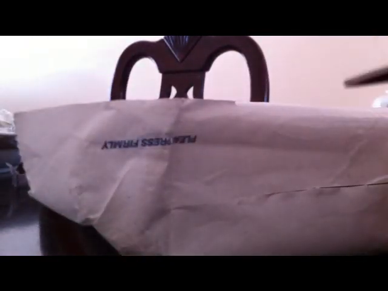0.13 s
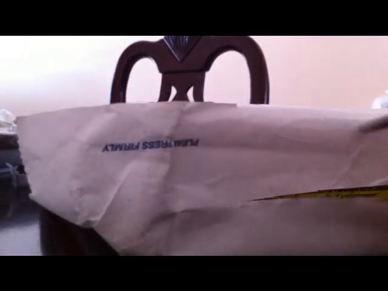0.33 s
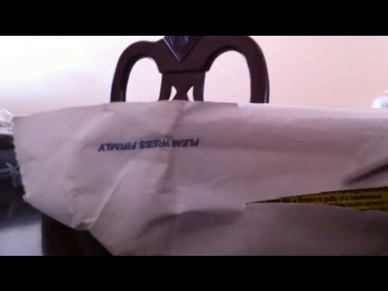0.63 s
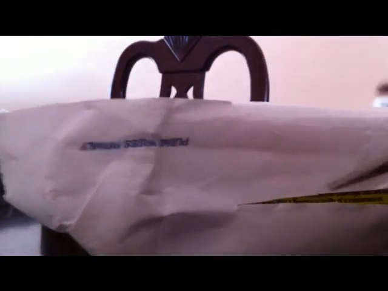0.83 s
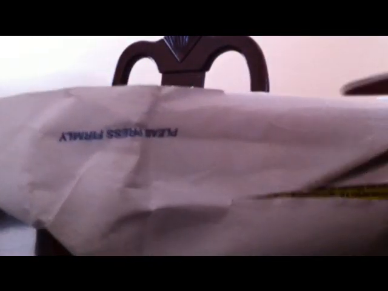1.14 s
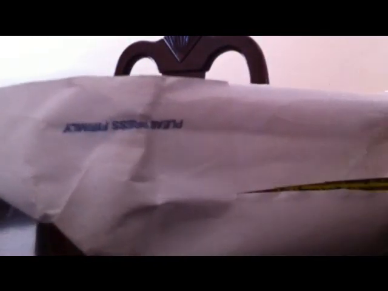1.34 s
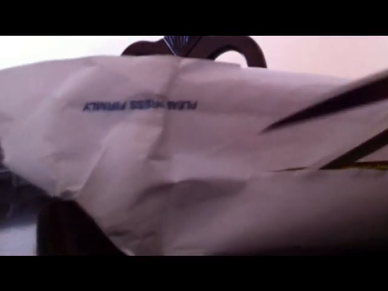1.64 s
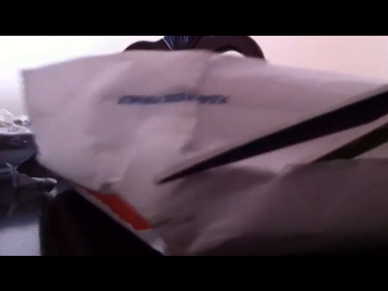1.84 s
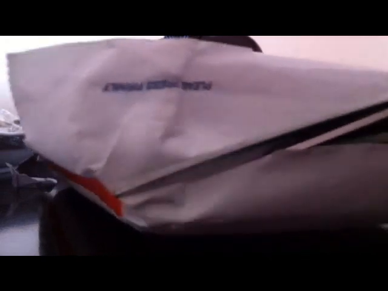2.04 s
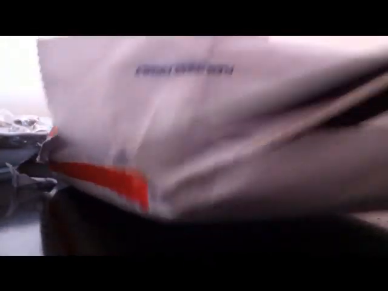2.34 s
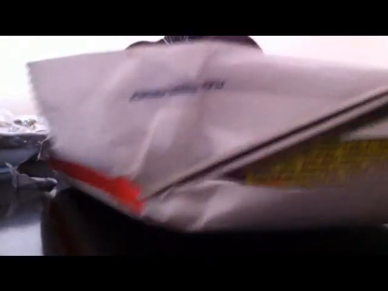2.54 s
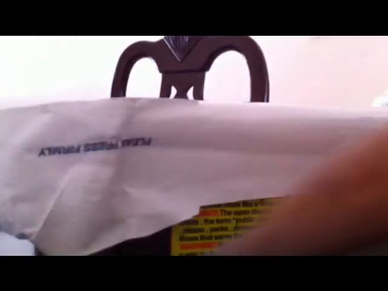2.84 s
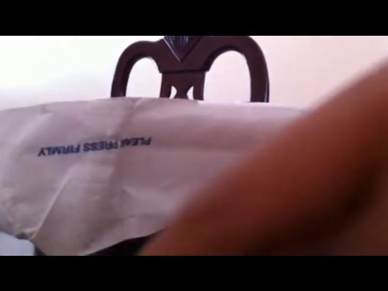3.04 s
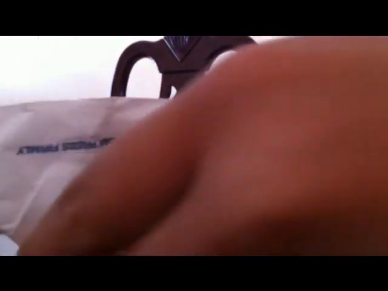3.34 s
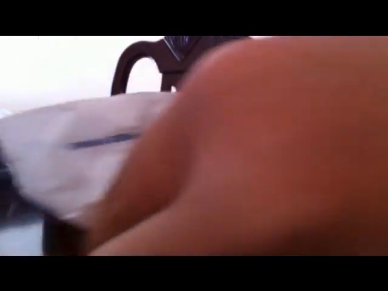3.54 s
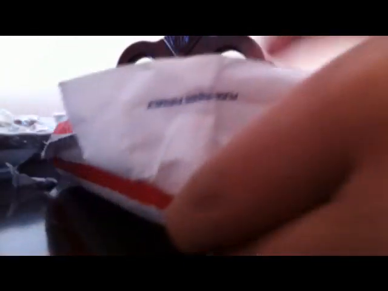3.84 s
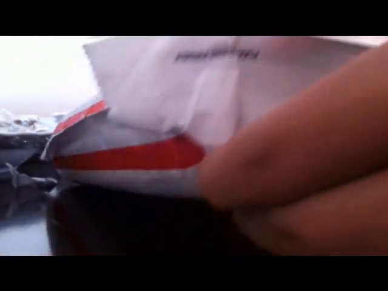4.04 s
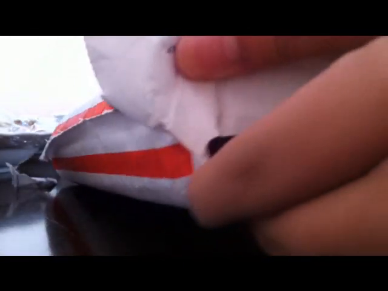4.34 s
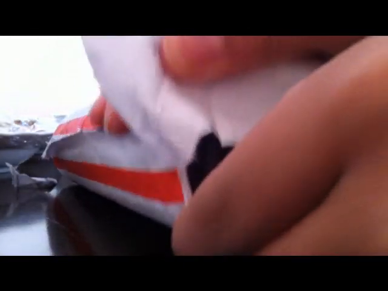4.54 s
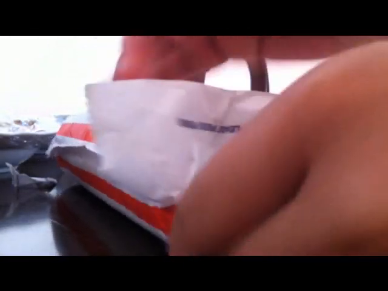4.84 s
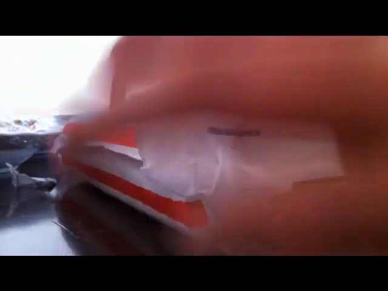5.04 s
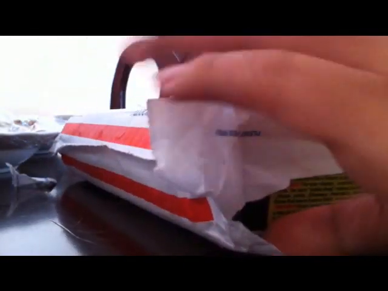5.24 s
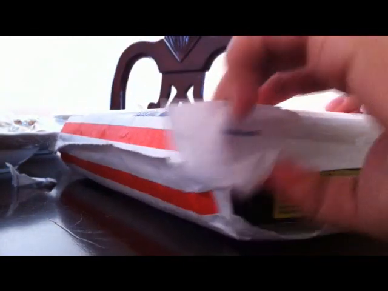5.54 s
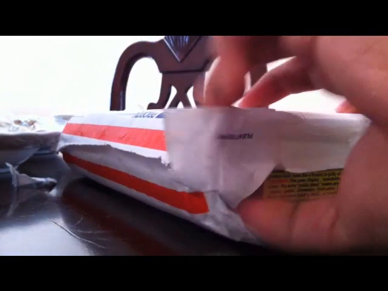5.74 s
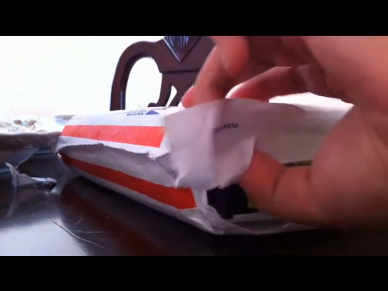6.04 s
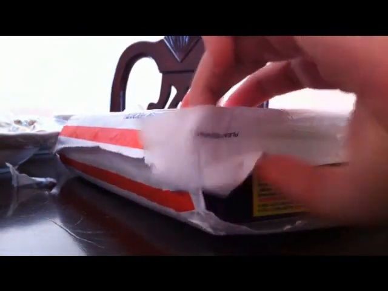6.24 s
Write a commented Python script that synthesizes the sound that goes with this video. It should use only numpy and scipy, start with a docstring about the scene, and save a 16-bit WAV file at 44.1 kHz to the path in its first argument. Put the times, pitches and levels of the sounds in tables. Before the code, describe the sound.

Quiet hiss with a faint low table hum that swells and fades throughout. From 0 to 0.6 s, weak paper rustles and small dull creases. At 0.84 s a sharp dry snap, then mostly quiet with little ticks near 0.93 and 1.28 s. From 1.7 to 2.3 s the stiff mailer is slit and torn: rough swishes, crackles, strongest around 2.0-2.15 s. Another rip and crumple at 2.5-2.9 s with a soft table thud. Light rubbing until 3.54 s, when the scissors land: a loud, hard metallic-wooden double knock, low thump and short rattle. At 3.75 s a very loud paper crack. A lull with tiny ticks, then dense bright crackling at 4.3-4.9 s, a crisp snap at 5.05 s, and scattered short crinkles and slides from 5.4 s, softening to 6.4 s. Close microphone, small hard room with brief echo.

```python
"""First a quiet hiss and a faint rustle; the table top's low hum swells and fades, made as narrow filtered noise.
Close to a small camera, a stiff paper mailer on a table is slit with scissors, torn and crumpled by hand.
Its fibres rip and rustle in clumps of tiny cracks; creases are spiky noise bursts through panel and parcel modes.
The scissors are laid on the table, a knock and rattle of resonances; weight lands as short, low decaying sines.
A small hard room answers, as decaying noise."""
import sys
import numpy as np
from scipy import signal
from scipy.fft import rfft, irfft, next_fast_len
from scipy.io import wavfile
from scipy.ndimage import uniform_filter1d, map_coordinates

SR = 44100
rng = np.random.default_rng(int(sys.argv[2]) if len(sys.argv) > 2 else 0)


def dump(signal):
    """Clip the signal to [-1, 1] and save it as 16-bit WAV at the path in sys.argv[1]."""
    limited = np.clip(np.atleast_2d(signal).T, -1, 1)
    pcm = np.round(limited * 32767).astype(np.int16)
    wavfile.write(sys.argv[1], SR, pcm)


N = 281358


def amp(db):
    """Decibels to gain."""
    return 10 ** (np.asarray(db) / 20)


def unit(x):
    """Scaled to rms 1."""
    return x / np.sqrt(np.mean(x ** 2) + 1e-20)


def along(points, hz):
    """Interpolate (frequency, value) points on a log frequency axis."""
    f, v = np.transpose(points)
    return np.interp(np.log(hz + 1), np.log(f + 1), v)


def curves(rows):
    """One value per sample for each column after the time."""
    s, *cols = np.transpose(rows)
    return [np.interp(np.arange(N) / SR, s, c) for c in cols]


def wobble(rate):
    """A smooth random curve, rate knots a second."""
    knots = rng.standard_normal(int(N * rate / SR) + 4)
    return map_coordinates(knots, [np.arange(N) * rate / SR])


def filtered(x, response):
    """x times a complex response of frequency, zero-padded."""
    n = x.shape[-1]
    m = next_fast_len(2 * n)
    return irfft(rfft(x, m) * response(np.fft.rfftfreq(m, 1 / SR)), m)[..., :n]


def mode(hz, width_hz):
    """A causal resonance of peak gain 1."""
    return lambda f: 1j * f * width_hz / (hz * hz - f * f + 1j * f * width_hz + 1e-9)


# Colour of the room and preamp hiss: (frequency [Hz], relative density [dB per Hz])
HISS_COLOUR = [(41, -49), (70, -35), (169, 13), (373, 9.5), (717, -2), (860, 0), (1550, 4), (13500, -14),
               (15500, -29)]
HISS_DB = -64  # centre of a slowly wandering level
# Spells of the table top's low ringing hum: (start [s], length [s], level [dB])
HUM_SPELLS = [(0.063, 0.53, -68), (0.838, .6, -69), (1.89, 0.34, -62.5), (2.61, 0.61, -68.5),
              (3.497, .35, -66), (4.617, 0.49, -74.5), (5.376, 0.41, -67)]
HUM_HZ, HUM_WIDTH_HZ = 179.8, 17
HUM_BETWEEN_DB, HUM_FADE_S = -77, 0.065  # the floor lies under the spells too


def background():
    """Coloured hiss wanders slightly in level; the table top's low hum, narrow filtered noise, swells and fades."""
    hiss = unit(filtered(rng.standard_normal(N), lambda f: amp(along(HISS_COLOUR, f))))
    hum = unit(filtered(rng.standard_normal(N), mode(HUM_HZ, HUM_WIDTH_HZ)))
    t = np.arange(N) / SR
    hum_gain = amp(HUM_BETWEEN_DB)
    for start, length, db in HUM_SPELLS:
        nearest_edge = np.minimum(t - start, start + length - t)
        hum_gain = hum_gain + amp(db) * np.clip(nearest_edge / HUM_FADE_S + .5, 0, 1)
    return amp(HISS_DB + wobble(4.72)) * hiss + hum_gain * hum


# Decay of the small hard room, before its furnishings: (frequency [Hz], t60 [s])
WALL_DECAY = [(150, 0.35), (600, 0.36), (2500, 0.41), (8000, 0.54), (14000, 1)]


def room(x):
    """The walls answer after a short gap; each frequency dies at its own speed."""
    hz, t, z = signal.stft(rng.standard_normal(SR // 2), SR, nperseg=256)
    fading = z * amp(-60 * t / along(WALL_DECAY, hz)[:, None])
    tail = signal.istft(fading, SR, nperseg=256)[1]
    tail = tail * np.clip(np.arange(len(tail)) / SR / 0.0017, 0, 1)
    # soft furnishings swallow the treble
    tail = filtered(tail, lambda f: 1 / (1 + 1j * f / 3300) ** 2)
    gap = np.zeros(round(.01 * SR))
    return signal.fftconvolve(x, np.r_[gap, tail / np.linalg.norm(tail)])[:N]


# Weight landing on the table top: (time [s], level before the attack and decay [dB])
TABLE_THUDS = [(2.527, -52), (2.836, -29), (3.54, -27), (4.721, -65), (4.864, -40), (5.415, -50)]
THUD_HZ, THUD_T60_S, THUD_ATTACK_S = 179, 0.082, 0.00081  # pitch varies a little around this


def thuds():
    """A soft push sets the table top's lowest mode going, a sine that dies quickly."""
    out, t = np.zeros(N + SR), np.arange(SR // 4) / SR
    for s, db in TABLE_THUDS:
        hz = THUD_HZ * np.exp(0.067 * rng.standard_normal())
        envelope = amp(db - 60 * t / THUD_T60_S) * (1 - np.exp(-t / THUD_ATTACK_S))
        out[round(s * SR):][:len(t)] += envelope * np.sin(2 * np.pi * hz * t)
    return out[:N]


def fibres(n, crackle):
    """Dense tiny cracks over a hiss of sliding fibres, n samples of rms 1."""
    sizes = amp(np.minimum(4 * rng.exponential(size=n), 11)) * rng.standard_normal(n)
    cracks = unit((rng.random(n) < .012) * sizes)
    return unit(crackle * cracks + rng.standard_normal(n))


def crinkles(depth):
    """Gain of a rubbing sound: small folds pop at random, sudden and dying in a few ms."""
    pops = (rng.random(N) < 45 / SR) * rng.exponential(size=N)
    decay = np.exp(-1 / (.004 * SR))
    return 1 + depth * signal.lfilter([1], [1, -decay], np.minimum(pops, 2.5))


# Colour of the rubbed paper: (frequency [Hz], relative density [dB per Hz])
SHEET_COLOUR = [(59, -38), (110, -10), (274, 1), (452, 3.5), (885, 6.5), (1730, 4), (2420, -1), (4260, 0),
                (13000, -8), (15000, -12.5)]
# The sheet in the hands, between strokes: (time [s], level [dB], body [dB re level])
RUSTLE_LEVELS = [(0.0, -58.5, -8.5), (0.32, -99, 29), (0.65, -65, 0), (0.95, -62, 4), (1.265, -73, 2),
                 (1.285, -51, 7), (1.43, -75.5, 11.5), (1.6, -84, 16.5), (1.8, -56.5, 0.5),
                 (2.04, -46.5, -12.5), (2.26, -58.5, -1.5), (2.57, -63, 3.5), (2.75, -43.5, -10),
                 (3.05, -60.5, -6), (3.3, -56.5, -10), (3.72, -57.5, -20), (3.78, -46.5, 1),
                 (3.92, -62.5, -6.5), (4.15, -65, -8), (4.3, -60.5, -5), (4.6, -54, -12), (4.98, -48, -5),
                 (5.18, -61, -13), (5.32, -59.5, -9), (5.45, -51.5, -16.5), (5.7, -55, -7), (6.38, -56, -7)]
RUSTLE_SIZZLE_DB, SIZZLE_GROWS = -11.5, 0.8  # re level, at -37 dB; dB gained per dB: harder handling is brighter


def rustle():
    """Cracks bunched in clumps, coloured by the sheet; the grip shifts weight to the body."""
    level_db, body_db = curves(RUSTLE_LEVELS)
    sizzle_db = RUSTLE_SIZZLE_DB + SIZZLE_GROWS * (level_db + 37)
    grain = fibres(N, crackle=0.69)
    shared = crinkles(depth=0.75)

    def band(low_hz, high_hz):
        """The sheet's colour between two edges, with clumps partly its own."""
        edges = lambda f: np.sqrt((1 + (low_hz / (f + 1)) ** 6) * (1 + (f / high_hz) ** 6))
        clumps = amp(2.2 * wobble(25)) * shared * crinkles(depth=.9)
        return unit(clumps * filtered(grain, lambda f: amp(along(SHEET_COLOUR, f)) / edges(f)))

    middle = band(1610, 9450)
    body = band(170, 780)
    sizzle = band(13500, 30000)
    return amp(level_db) * (middle + amp(body_db) * body + amp(sizzle_db) * sizzle)


# Single rips or slides of the sheet:
# (time [s], rise [s], hold [s], level before swell and crinkles [dB], ring [Hz])
SHEET_STROKES = [(0.269, .018, 0.016, -60.5, 2000), (0.527, 0.048, 0.041, -54, 2320),
                 (1.731, 0.089, 0.036, -46, 1780), (1.863, 0.034, 0.053, -45.5, 2550),
                 (2.036, 0.042, 0.047, -42.5, 2120), (2.135, 0.0047, 0.0041, -29.5, 2220),
                 (2.147, 0.0031, 0.032, -37, 2360), (2.363, 0.0046, 0.031, -57, 940),
                 (2.483, 0.0012, 0.015, -42, 1950), (2.515, 0.0046, 0.052, -42, 2400),
                 (2.643, 0.0061, 0.22, -51.5, 1650), (2.774, 0.0014, 0.016, -34.5, 2200),
                 (2.79, 0.025, 0.03, -39, 3530), (2.912, 0.0035, 0.068, -45.5, 5270),
                 (3.075, .016, 0.1, -57.5, 4970), (3.237, .003, 0.046, -51, 5170),
                 (3.322, 0.0049, 0.074, -47.5, 2900), (4.268, 0.026, 0.081, -51.5, 5070),
                 (4.862, .0044, 0.016, -35, 4900), (4.901, 0.028, 0.14, -65, 1030),
                 (5.056, 0.0039, 0.081, -52.5, 2540), (5.506, 0.0035, 0.048, -48.5, 3780),
                 (5.57, 0.0038, 0.13, -53.5, 2800), (5.652, 0.0017, 0.021, -47.5, 6030),
                 (5.782, 0.063, 0.027, -46, 2070), (5.919, 0.027, 0.02, -51.5, 1690),
                 (6.168, 0.0052, 0.031, -54, 4370)]
FALL_S, FALL_PER_HOLD = 0.031, 0.67  # longer strokes fade slower
STROKE_TILT_DB = 1.5  # per octave around 3 kHz


def strokes():
    """Each stroke swells, holds and fades, and sings faintly where the taut panel resonates."""
    out, t = np.zeros(N + SR), np.arange(SR // 4) / SR
    tilt = lambda f: amp(STROKE_TILT_DB * np.clip(np.log2((f + 1) / 3000), -1.5, 1.5))
    for s, rise, hold, db, hz in SHEET_STROKES:
        fall = FALL_S + FALL_PER_HOLD * hold
        corners_s = np.cumsum(np.abs([0, rise, hold, fall, .01]))
        effort_db = np.interp(t, corners_s, [-20, 1, -1, -48, -90])
        ring = lambda f: 1 + amp(5) * np.abs(mode(hz, .2 * hz)(f)) ** 2
        colour = lambda f: amp(along(SHEET_COLOUR, f)) * tilt(f) * ring(f)
        rip = unit(filtered(fibres(len(t), crackle=0.11), colour))
        out[round(s * SR):][:len(t)] += amp(db + effort_db) * rip
    return out[:N] * crinkles(depth=1.0)


# The scissors touch the table: (time [s], knock peak [dB])
SCISSOR_TOUCHES = [(3.538, -9.5), (3.5519, -17.5)]
# Modes of the scissors with the table under them: (frequency [Hz], level [dB], rattle t60 [s])
SCISSOR_MODES = [(213, -10, .1), (496, 0, 0.18), (845, -19, 0.19), (1110, -5, 0.18), (1790, -0.5, 0.26),
                 (2615, -2.5, 0.1), (3780, -10.5, 0.12)]
CRACK_DB = -25  # the broad edge of the knock
CONTACT_S = 0.00253
RATTLE_DB, RATTLE_WIDTH_HZ = -20.5, 74  # re knock; loose blades
SCISSORS_ECHO_DB = -18  # share sent to the room


def scissors():
    """Each touch is a short knock coloured by the modes; the loose blades rattle on faintly in the same modes."""
    out, t = np.zeros(N + SR), np.arange(SR // 2) / SR

    def body(f):
        """The modes with alternating sign, and the broad crack."""
        modes = sum((-1) ** k * amp(level) * mode(hz, 300)(f) ** 2
                    for k, (hz, level, _) in enumerate(SCISSOR_MODES))
        return modes + amp(CRACK_DB) * mode(4000, 7000)(f)

    for s, db in SCISSOR_TOUCHES:
        push = rng.standard_normal(len(t)) * t * np.exp(-t / (CONTACT_S / 4))
        knock = filtered(push, body)
        knock = knock / np.abs(knock).max()
        rattle = np.zeros(len(t))
        for hz, level, t60 in SCISSOR_MODES:
            ringing = unit(filtered(rng.standard_normal(len(t)), mode(hz, RATTLE_WIDTH_HZ)))
            rattle += amp(level - 60 * t / t60) * ringing
        rattle *= 1 - np.exp(-t / 0.001)
        out[round(s * SR):][:len(t)] += amp(db) * (knock + amp(RATTLE_DB) * rattle)
    return out[:N]


# Creases snapping close by: (time [s], ring energy [dB re 1 ms at full scale], ring [Hz],
# thump [dB re ring], sizzle [dB re ring], nominal length [ms])
CREASE_SNAPS = [(0.1993, -44.5, 1170, 3, -10.5, 5.6), (0.4018, -39.5, 2250, -10, -7.5, 4.6),
                (0.4268, -35, 690, 6.5, -25, 2), (0.5041, -37, 1110, 5.5, -3, 3.4),
                (0.8373, -16, 3020, -19, -5, 0.97), (0.8387, -23, 1110, -7, -23, 0.87),
                (0.9258, -37, 1970, -7.5, -27, 0.51), (1.2753, -30, 2450, -1, -12.5, 2.3),
                (1.604, -48.5, 890, 5.5, -24, 6.4), (1.6434, -46, 900, 7, -9, 6),
                (1.871, -37, 2150, -5, -5, 4.6), (1.881, -30, 1790, -5, -4.5, 3.2),
                (1.9941, -19.5, 1450, -7.5, -10, 2.2), (2.055, -36, 1000, 2.5, -16, 7.9),
                (2.082, -24, 1480, -12, -16, 17), (2.1341, -18.5, 1890, -3.5, -27, 3.7),
                (2.145, -21, 2200, -25, -22, 1.2), (2.2801, -24.5, 1770, -5, -9, 1.4),
                (2.2889, -27.5, 2500, -8, -11, 0.76), (2.3184, -35.5, 870, 9, -30, 6.7),
                (2.5538, -30, 3080, -5, -24, 2.1), (2.562, -40, 2250, 2, 3, 2.1),
                (2.6213, -41, 1180, -1.5, -19, 2.9), (2.651, -36, 1530, -14, -24, 4.8),
                (2.7748, -20, 2270, -17, -23, 7.9), (2.8142, -22.5, 1150, 1, -7.5, 3.4),
                (2.8349, -24.5, 2090, -1.5, -3.5, 3.2), (2.8425, -27, 2750, 1.5, -16, 4.5),
                (3.013, -46.5, 800, 2, 0, 12), (3.117, -50, 1220, 11, -8, 4.8),
                (3.492, -41.5, 3040, -9, -18, 4.5), (3.743, -7.5, 950, -19.5, -22, 1.1),
                (3.747, -13, 2260, -16, -37, 1.3), (3.7507, -17.5, 1780, -7, -18, 1.9),
                (4.101, -47, 2590, -21, -11, 1.5), (4.1333, -41, 2350, -30, -10, 2.4),
                (4.1481, -43.5, 2880, -5, -26, 1.9), (4.1934, -45, 2880, 4, -27, 1.3),
                (4.3056, -39, 2400, -16, -18, 8.7), (4.357, -38, 2240, -1.5, -2, 8.5),
                (4.408, -37.5, 4350, -29, -24, 4.7), (4.424, -33, 4500, -28, -12, 0.39),
                (4.466, -29, 1950, -17, -29, 2.7), (4.482, -28.5, 5230, -35, -24, 28),
                (4.4961, -23.5, 4470, -42, -20, 5.1), (4.5114, -29, 3200, -6.5, -3.5, 2.4),
                (4.5236, -30, 3780, -33, -17, 0.62), (4.548, -28, 4400, -37, -24, 6.4),
                (4.5597, -26.5, 4400, -29, -23, 6.2), (4.595, -43, 3290, 4, -10, 7.6),
                (4.62, -42, 3170, -12, -20, 3.8), (4.7067, -35, 4010, -13, -17, 10),
                (4.7162, -32.5, 3570, -9.5, -4, 6.6), (4.7268, -33, 2930, -19, -2, 7.9),
                (4.7403, -28.5, 1900, -22, -2, 3.6), (4.778, -39.5, 2720, -24, 1, 12),
                (4.8608, -24, 2300, -6, -8.5, 1.3), (4.8736, -34.5, 3520, 3, -16, 5.8),
                (4.9913, -40, 2880, -13, -13, 0.9), (5.0053, -36, 3400, 0.5, -2, 1.1),
                (5.049, -17, 5640, -19.5, -15, 1.2), (5.052, -27, 4120, -7, -34, 1.6),
                (5.4198, -33, 4440, -15.5, -1.5, 6.2), (5.506, -29.5, 3970, -23, -4, 15),
                (5.656, -28, 5230, -33, -5, 2), (5.703, -43, 2280, -10, -2.5, 1.4),
                (5.8539, -31, 1690, -2, -6, 2.7), (5.971, -36, 1670, -17, -1, 2.7),
                (6.02, -43, 5760, -15, -27, 1.1), (6.082, -40.5, 3970, -13, -22, 0.26),
                (6.14, -42, 3140, -8, -10, 3.7), (6.2907, -57, 3280, -11, -14, .9)]
SPREAD_OCT, SPREAD_FALLS = 0.87, 0.088  # width setting of a 2 kHz ring; amount lost per octave of pitch
THUMP_HZ, THUMP_SCATTER, THUMP_WIDTH = 454, 0.19, 1  # the parcel; random share per crease; width over pitch
THUMP_ECHO_DB = -6.5  # thumps travel through the table more than the air
ECHO_DB, ECHO_SHRINKS = -16.5, 0.098  # room share at -16 dB; dB lost per dB of strength (loud ones are near)


def snaps():
    """Each crease lets go in a spiky burst that rings the panel beside it, thumps parcel and table, and sizzles.
    Returns the direct sound and the share that excites the room."""
    s, db, hz, thump_db, sizzle_db, lasts_ms = np.transpose(CREASE_SNAPS)[:, :, None]
    t = np.arange(2048) / SR
    chance = rng.standard_normal((len(CREASE_SNAPS), 3, len(t)))
    thump_hz = THUMP_HZ * np.exp(THUMP_SCATTER * chance[:, 1, -1:])

    spikes = amp(9.9 * uniform_filter1d(chance[:, 2], size=9, axis=1))  # micro-slips inside one burst
    decay_s = np.clip(0.0011 * lasts_ms, .0003, .03)
    envelope = (1 - np.exp(-t / 0.00005)) * np.exp(-t / decay_s)
    burst = chance[:, 0] * spikes * envelope

    def sized(x):
        """Each row at the energy of 1 ms at full scale."""
        return x / np.linalg.norm(x, axis=1, keepdims=True) * np.sqrt(SR / 1000)

    # many panel modes blur around a main one
    spread = np.clip(SPREAD_OCT - SPREAD_FALLS * np.log2(hz / 2000), .2, 2)
    broad = lambda f: mode(hz, 1.8 * spread ** 2 * hz)(f) ** 2
    narrow = lambda f: amp(-20) * mode(hz, .13 * hz)(f) ** 2
    panel = sized(filtered(burst, lambda f: (broad(f) + narrow(f)) * mode(2300, 6500)(f)))

    table = lambda f: amp(-9.5) * mode(150, 120)(f) ** 2 + amp(-29)
    parcel_mode = lambda f: mode(thump_hz, THUMP_WIDTH * thump_hz)(f) ** 2
    parcel = lambda f: (parcel_mode(f) + table(f)) / (1 + 1j * f / 1100)
    thump = sized(filtered(chance[:, 1] * envelope, parcel))
    sizzle = sized(filtered(burst, lambda f: mode(7800, 5500)(f) ** 3))
    direct = amp(db) * (panel + amp(thump_db) * thump + amp(sizzle_db) * sizzle)

    # heard from all sides, a crease is smoother in colour
    click = np.broadcast_to(t == 0, burst.shape) * 1.
    ring_around = sized(filtered(click, lambda f: mode(hz, 1.5 * hz)(f)))
    thump_around = amp(thump_db + THUMP_ECHO_DB) * sized(filtered(click, parcel))
    echo_db = ECHO_DB - ECHO_SHRINKS * (db + 16)
    to_room = amp(db + echo_db) * (ring_around + thump_around)

    where = (np.round(s * SR).astype(int) + np.arange(len(t))).ravel()
    return [np.bincount(where, x.ravel(), N + SR)[:N] for x in (direct, to_room)]


def scene():
    """Paper and scissors close by, their echo, the hiss and the table top's hum."""
    creases, creases_to_room = snaps()
    rubbing = strokes() + rustle()
    metal = scissors()
    echo = room(creases_to_room + amp(-33) * rubbing + amp(SCISSORS_ECHO_DB) * metal)
    return (background() + echo + thuds() + rubbing + metal + creases)[None]


TOP_HZ = 15300


def record(dry):
    """The microphone thins the deep bass and dulls the top; the camera keeps nothing above its band limit."""
    bass = lambda hz: (amp(-4.5) + 1j * hz / 150) / (1 + 1j * hz / 150)
    treble = lambda hz: (hz < TOP_HZ) / np.sqrt(1 + (hz / 14200) ** 24)
    return filtered(dry, lambda hz: treble(hz) * bass(hz))


dry = scene()
out = record(dry)
dump(out)
```